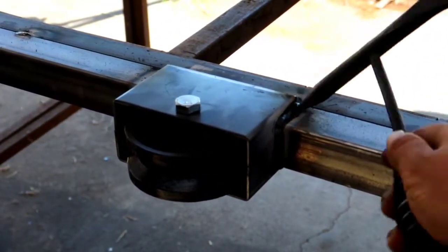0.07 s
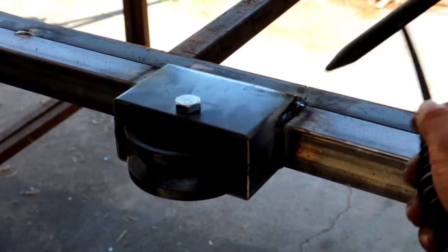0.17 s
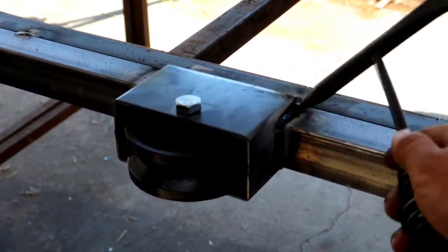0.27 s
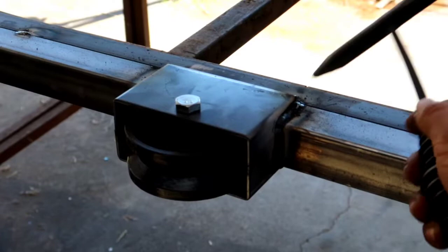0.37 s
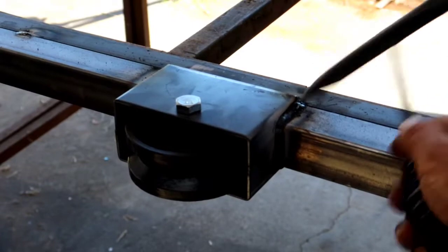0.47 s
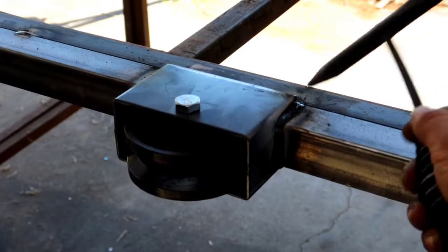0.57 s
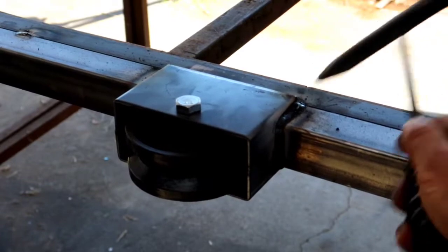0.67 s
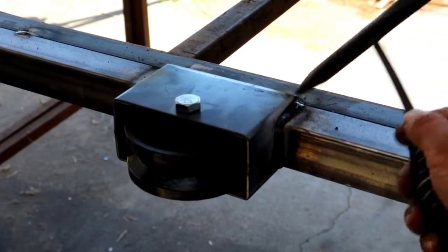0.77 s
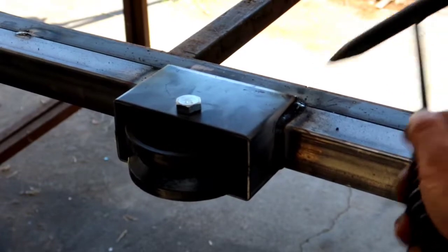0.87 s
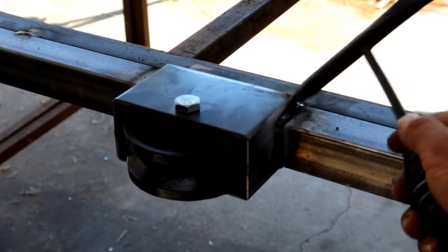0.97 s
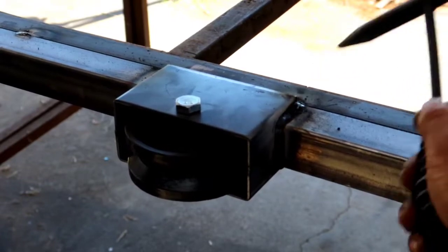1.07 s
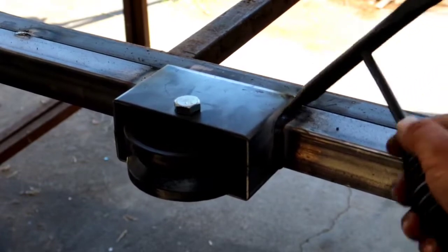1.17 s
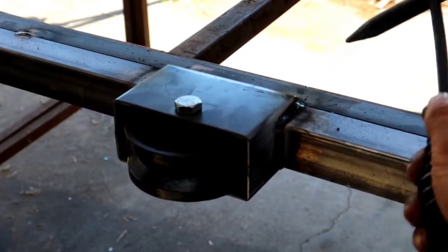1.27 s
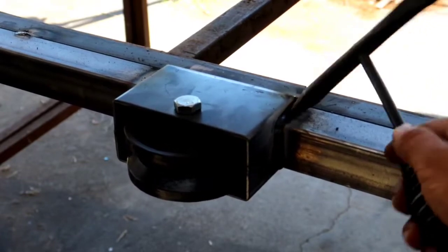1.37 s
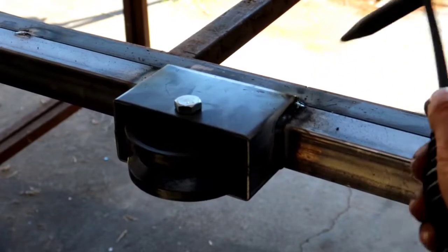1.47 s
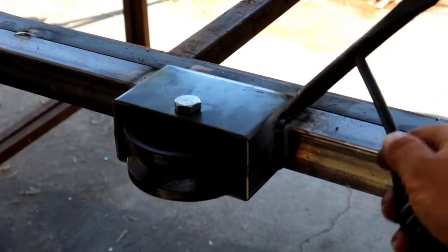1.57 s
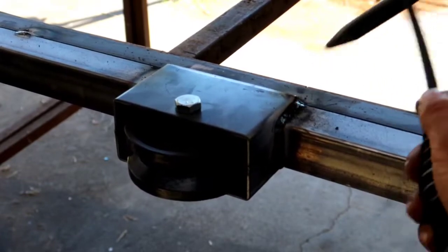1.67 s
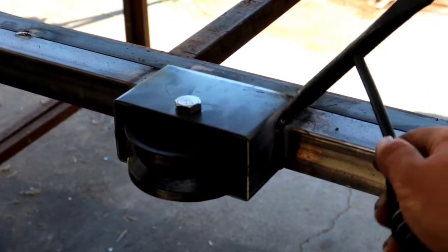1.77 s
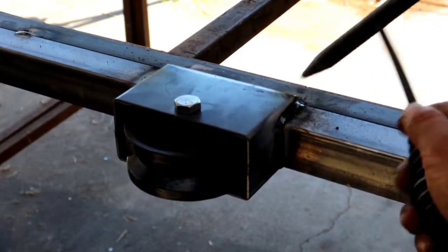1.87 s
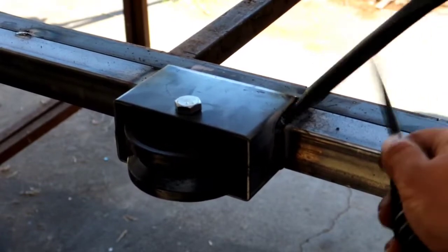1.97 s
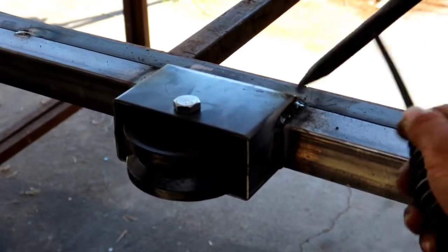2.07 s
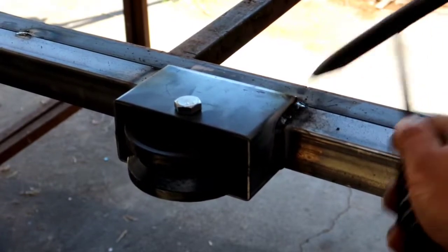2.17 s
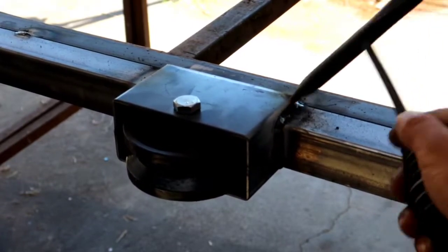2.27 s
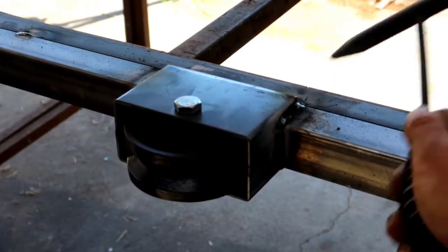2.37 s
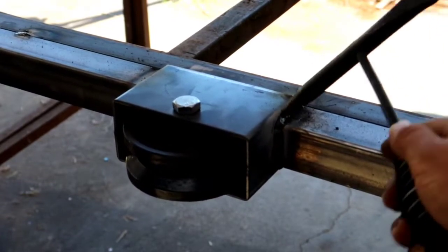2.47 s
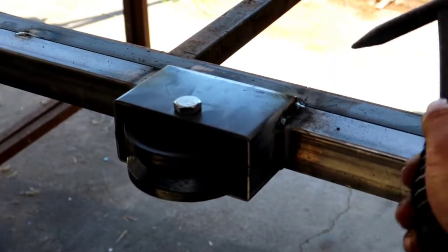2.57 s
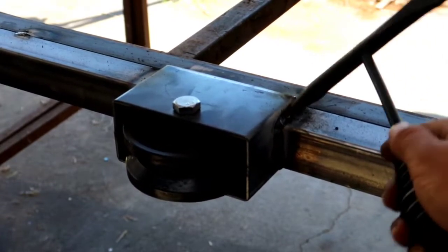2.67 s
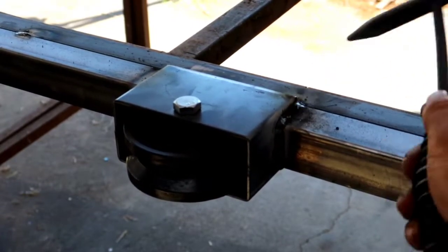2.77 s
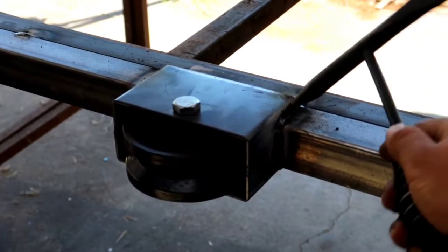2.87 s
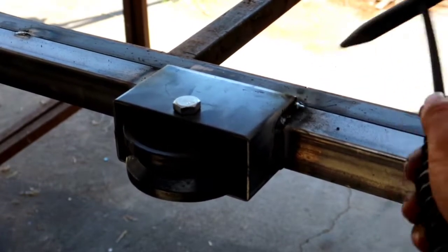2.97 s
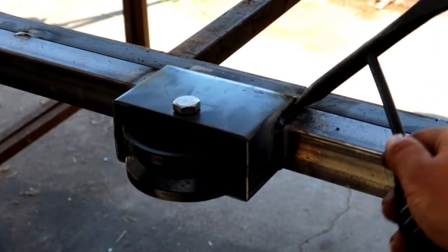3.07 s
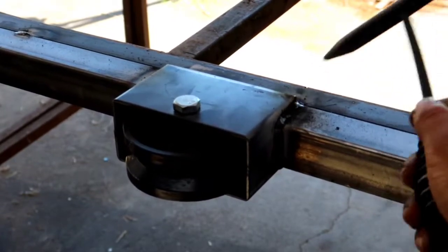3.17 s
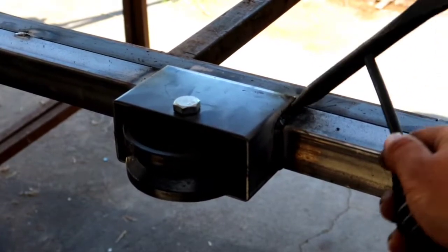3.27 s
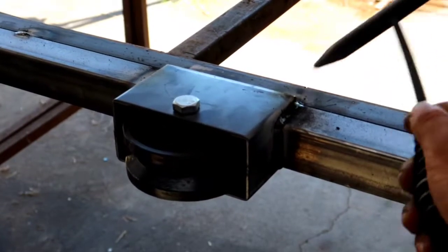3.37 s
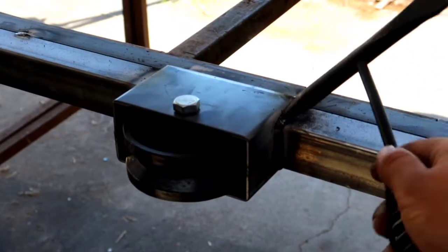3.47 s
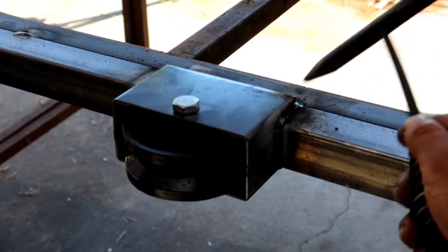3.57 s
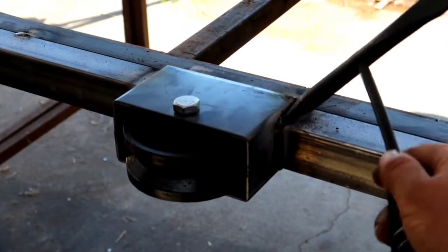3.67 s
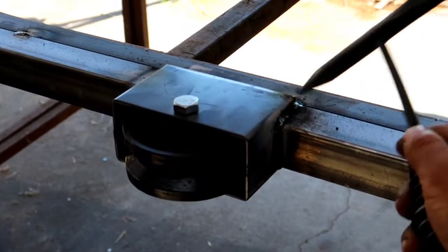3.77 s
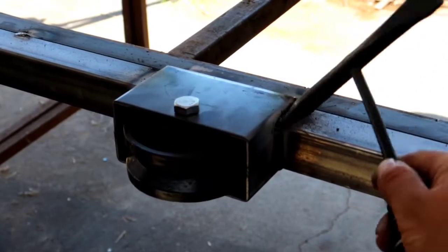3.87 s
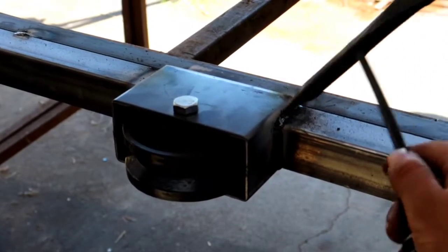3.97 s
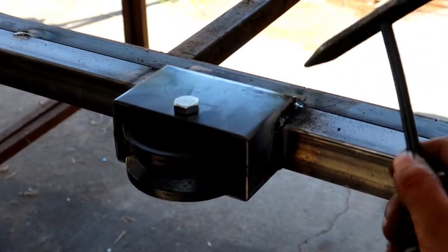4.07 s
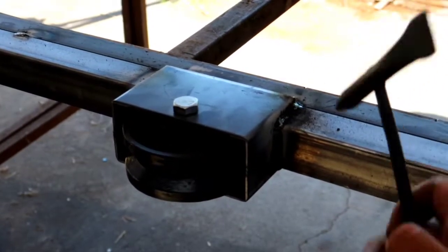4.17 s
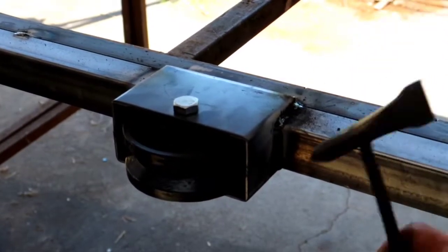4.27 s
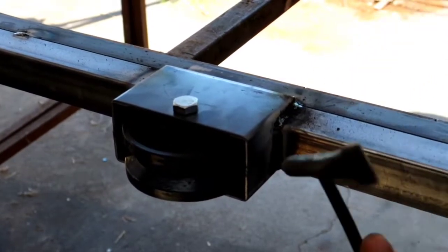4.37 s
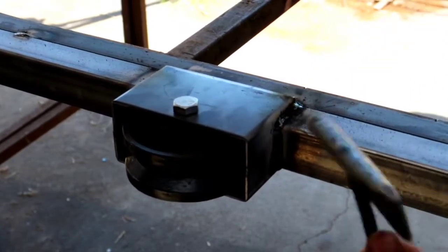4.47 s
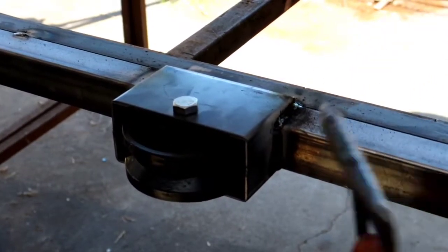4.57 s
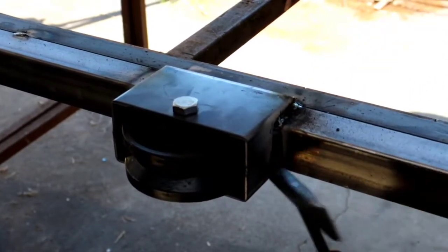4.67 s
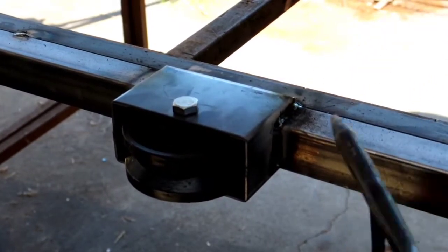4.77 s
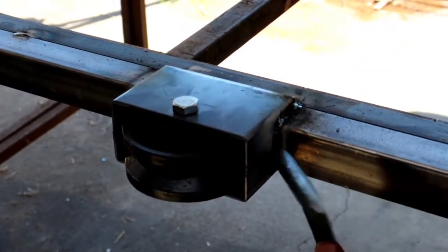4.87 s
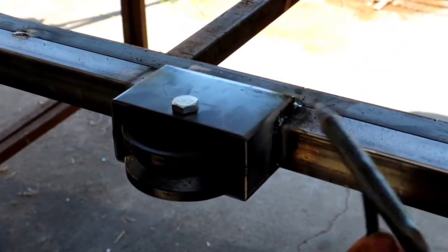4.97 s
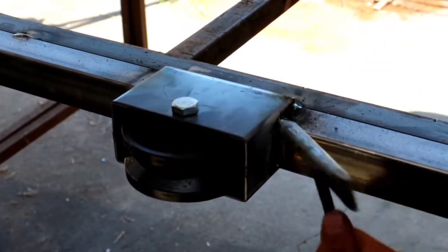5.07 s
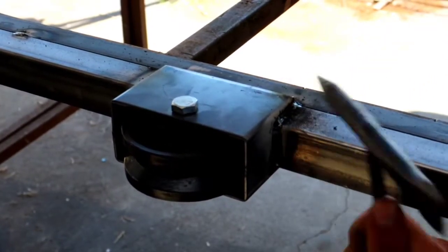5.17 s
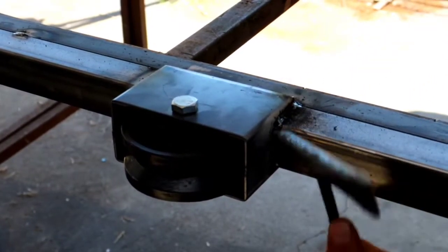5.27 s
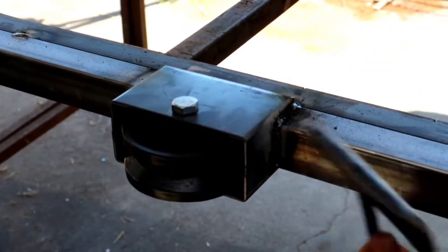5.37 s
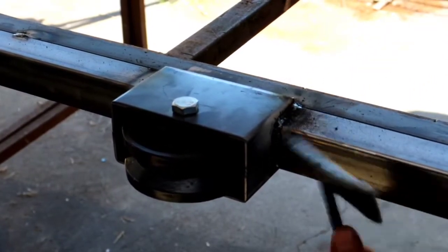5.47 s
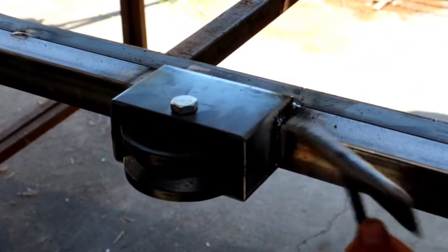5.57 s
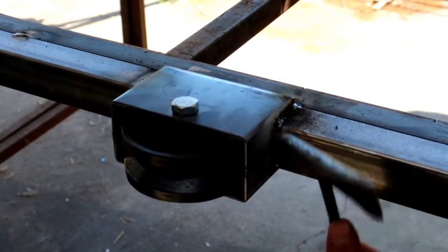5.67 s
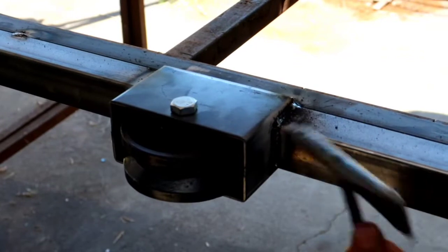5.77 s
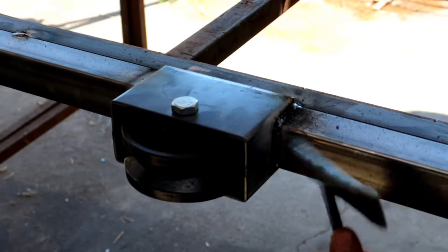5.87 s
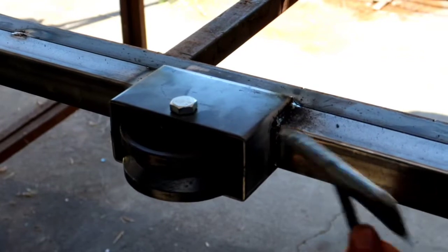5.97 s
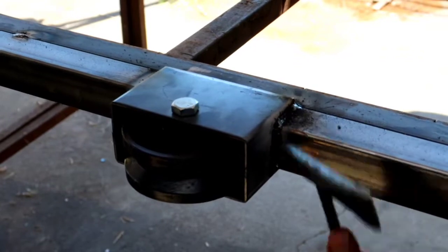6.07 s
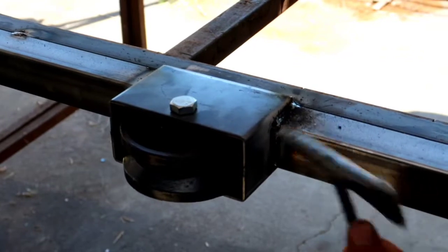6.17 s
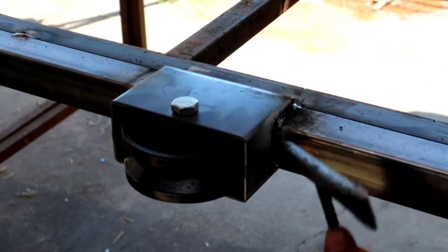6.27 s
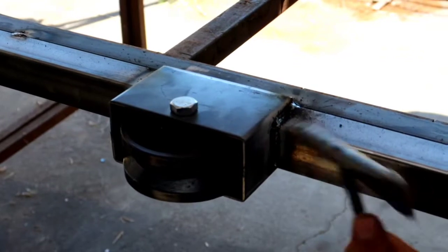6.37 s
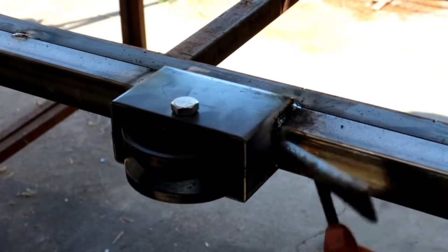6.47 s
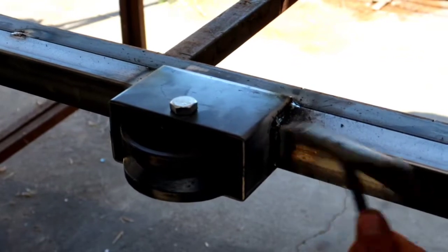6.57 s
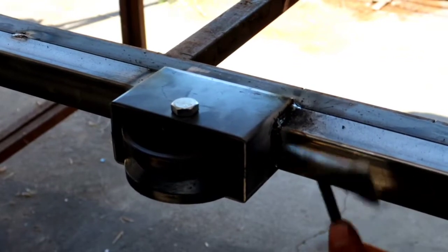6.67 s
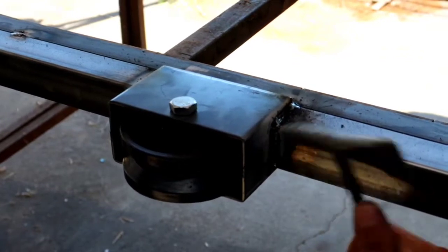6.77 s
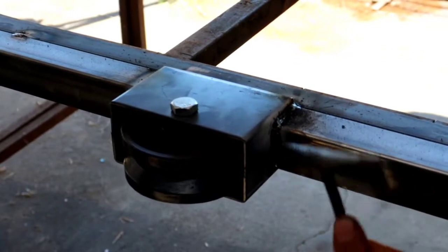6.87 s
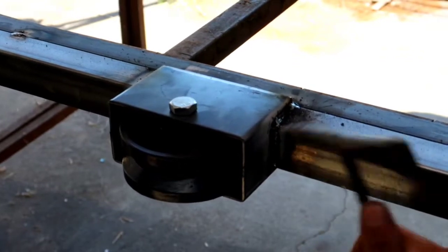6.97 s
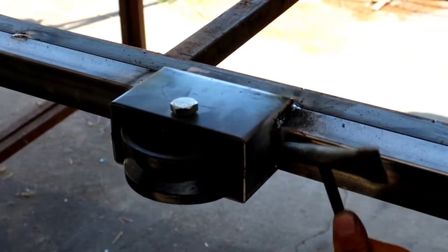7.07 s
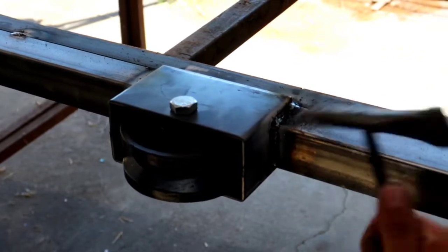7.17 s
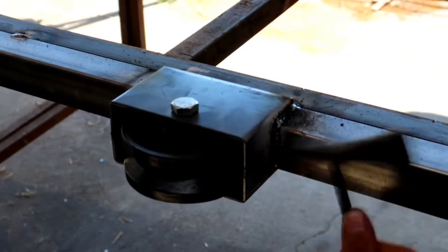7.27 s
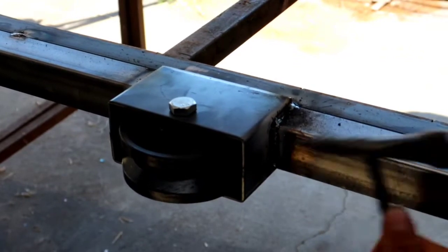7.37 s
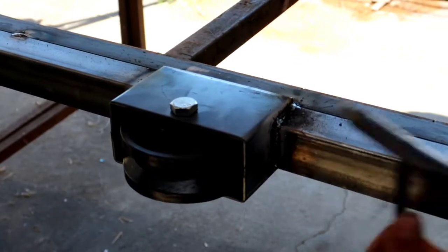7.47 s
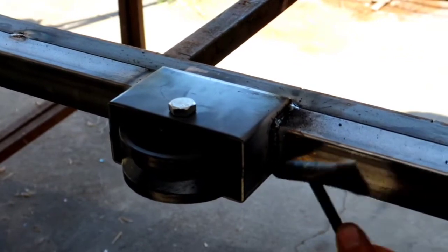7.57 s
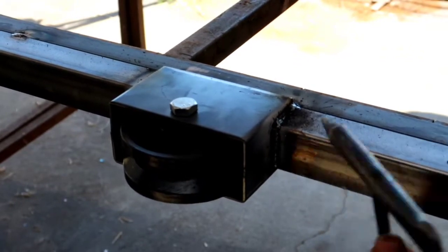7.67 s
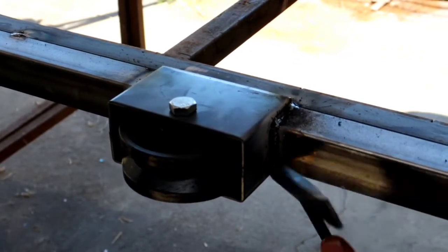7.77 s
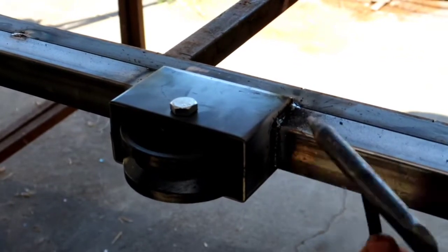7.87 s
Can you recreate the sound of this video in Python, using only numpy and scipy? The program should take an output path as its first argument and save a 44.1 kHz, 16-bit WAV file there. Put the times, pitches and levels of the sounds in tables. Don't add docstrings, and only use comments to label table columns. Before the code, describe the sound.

A pointed steel hammer taps a weld on a hollow steel frame about five times a second, pauses briefly, then taps from another side.

```python
import sys
import numpy as np
from scipy import signal
from scipy.fft import rfft, irfft, next_fast_len
from scipy.io import wavfile
from scipy.ndimage import uniform_filter1d, minimum_filter1d, map_coordinates

SR = 44100
rng = np.random.default_rng(int(sys.argv[2]) if len(sys.argv) > 2 else 0)


def wav_out(sig):
    wavfile.write(sys.argv[1], SR, np.round(np.clip(np.atleast_2d(sig).T, -1, 1) * 32767).astype(np.int16))


def amplitude_ratio(level_db):
    exponent = np.asarray(level_db, float) / 20
    return 10 ** exponent


N = 349713
LIFE = SR // 2
TURN_S = 4.4

# (time [s], force [dB], squareness of the hit [dB], share on the tube wall [dB],
# bare steel against slag [dB])
FIRST_TAPS = [(-0.043, -22, -10.5, -14, 5), (0.1688, -19, 2.5, -0.5, 0), (0.3797, -20.5, 2.5, 0, 0.5),
              (0.5895, -21.5, -2.5, -9, 1.5), (0.7958, -18.5, -18, -10, 0.9), (1.0066, -20, 5.5, -0.5, 0.5),
              (1.2229, -21.5, 4.5, -8.5, 2.5), (1.4345, -20.5, -4, -6.5, -2.5),
              (1.653, -21.5, 4.5, -15, 0.5), (1.8676, -22.5, -11, -9, 2), (2.0875, -22.5, -0.5, -3, 1),
              (2.2981, -21.5, -3.5, 1, 0.5), (2.5129, -20, -9, 0, 2.5), (2.7354, -20.5, 1, -4, 2),
              (2.9445, -18.5, -2, -3, 0.5), (3.1555, -21.5, 4.5, 0.5, 0.5), (3.3605, -25, -15, -0.5, 4.5),
              (3.575, -24, 9, -15.5, 6.5), (3.7831, -24.5, 3.2, -15, 6), (3.9811, -29, 1.5, 1.5, 4)]
# (time [s], force [dB], squareness of the hit [dB], share on the tube wall [dB],
# bare steel against slag [dB])
SECOND_TAPS = [(4.7306, -21.5, -9, -0.5, 3), (4.9536, -22.5, -3.5, 2, 5.5), (5.1625, -29.5, 7, 11, 9),
               (5.385, -24.5, 2.6, 2.5, 3.5), (5.595, -25.5, 3.5, -10, 1.5), (5.789, -24.5, 9.5, -15.5, 6),
               (5.994, -26.5, 3.2, 0.5, 6.5), (6.1911, -26.5, 8, -15, 6.5), (6.3852, -27.5, 6, -15, 5.5),
               (6.584, -27, 5, 0.5, 4.5), (6.7906, -28.5, 0.5, 5.5, 3.5), (6.989, -28, -0.5, -2.5, 0.5),
               (7.1836, -25, 2, 4.5, 5.7), (7.395, -23.5, -9.5, 0, 4.5), (7.6313, -24, 4.5, 6, 4),
               (7.844, -22.5, 2, -3.5, 2.5)]
TAPS = FIRST_TAPS + SECOND_TAPS
TAP_S, FORCE_DB, SQUARE_DB, WALL_DB, BARE_DB = np.transpose(TAPS)[..., None]
FROM_FIRST = TAP_S < TURN_S


def unit(x):
    return x / np.sqrt(np.mean(x ** 2) + 1e-20)


def along(points, hz):
    f, v = np.transpose(points)
    return np.interp(np.log(hz + 1), np.log(f + 1), v)


def shaped(x, gain):
    m = next_fast_len(x.shape[-1] + 4096)
    spectrum = rfft(x, m) * gain(np.fft.rfftfreq(m, 1 / SR))
    return irfft(spectrum, m)[..., :x.shape[-1]]


def stereo_spread(hz, wider_db=0):
    # (frequency [Hz], side minus mid [dB])
    side_over_mid = [(60, -28), (110, -32.5), (200, -31), (380, -26), (700, -24.5), (1290, -15.5),
                     (2380, -13), (4400, -5.5), (8120, 0), (15000, -4)]
    return np.array([np.ones_like(hz), np.minimum(amplitude_ratio(along(side_over_mid, hz) + wider_db), 1)])


def reach(base_db, per_square, per_wall, per_bare):
    return base_db + per_square * SQUARE_DB + per_wall * WALL_DB + per_bare * BARE_DB


def snap_lift():
    lift_s, lift_db = [2.2981, 2.5129, 5.1626], [1.5, 1, 7.5]
    return np.dot(np.abs(TAP_S - lift_s) < .05, lift_db)[:, None]


def ring(modes, scatter_db, detune, swell, rough, size=16000):
    hz, db, t60 = np.transpose(modes)
    t60 = np.minimum(t60, .5)
    t = np.arange(size, dtype=np.float32) / SR
    knots = np.clip(1 - np.abs(t * 80 - np.arange(31, dtype=np.float32)[:, None]), 0, 1)
    luck = rng.standard_normal((len(TAPS), len(modes), 2 + 2 * len(knots)), dtype=np.float32)
    decay = amplitude_ratio(db[:, None] - 60 * t / t60[:, None]) * (1 - np.exp(-t / swell))
    rows = []
    for row in luck:
        strength, bend = row[:, 0], row[:, 1]
        waver, drift = row[:, 2:].reshape(len(modes), 2, -1).transpose(1, 0, 2) @ knots
        phase = 2 * np.pi * np.outer(hz * (1 + detune * bend), t) + rough * (drift - drift[:, :1])
        partials = decay * (1 + .5 * rough * waver) * np.sin(phase, dtype=np.float32)
        rows.append(amplitude_ratio(scatter_db * strength) @ partials)
    return np.pad(rows, ((0, 0), (0, LIFE - size)))


def hammer_tip():
    # (frequency [Hz], level [dB], t60 [s])
    tip_before = [(1010, -17.5, 0.022), (1538, -4, 0.024), (3730, -6, 0.018), (4460, -7, 0.0056),
                  (7160, -15, 0.013), (8830, -20.5, 0.014), (13660, -26, .004)]
    # (frequency [Hz], level [dB], t60 [s])
    tip_after = [(847, -14, 0.12), (1376, -9, 0.075), (1710, -2, 0.02), (2460, -9.5, 0.042),
                 (4630, -12, 0.018), (7220, -12, 0.0089), (13700, -25, .004)]
    t = np.arange(LIFE) / SR
    crack_hz = np.where(FROM_FIRST, 2535, 3004)
    ping_hz, ping_t60_s = 4820, 0.012
    ping_db = reach(1.7, -0.27, 0.93, 0.25) + snap_lift()
    tip = np.where(FROM_FIRST, ring(tip_before, 2, .03, 1e-4, 0, size=2000),
                   ring(tip_after, 2, .03, 1e-4, 0, size=2000))
    tip = tip + amplitude_ratio(3.4 - 60 * t / 0.012) * np.sin(2 * np.pi * np.outer(crack_hz, t))
    tip *= amplitude_ratio(9.5 + 1.3 * SQUARE_DB)
    return tip + amplitude_ratio(ping_db - 60 * t / ping_t60_s) * np.sin(2 * np.pi * ping_hz * t)


def tube_wall():
    # (frequency [Hz], level [dB], t60 [s])
    wall_boom = [(853, 5.5, .1)]
    return ring(wall_boom, 0, .005, 0.005, 0.7) * amplitude_ratio(3 + 1.26 * WALL_DB)


def steel_modes():
    # (frequency [Hz], level [dB], t60 [s])
    bar_modes = [(2575, -4, .1), (2612, -9, .25), (2640, -9, .33), (2668, -11, .3), (2695, -10, .33),
                 (2745, -6, .14)]
    # (frequency [Hz], level [dB], t60 [s])
    frame_modes = [(555, -18.5, 0.53), (618, -23, 0.78), (695, -34, 0.19), (1286, -9, 0.11),
                   (1308, -9, 0.21), (1610, -16.5, 0.22), (1970, -25.5, 0.11), (1962, -5.5, 0.25),
                   (2194, -8.5, 0.2), (3090, -22.5, 0.3), (3250, -7, 0.26), (4160, -25, 0.12),
                   (4063, -11, 0.24), (4325, -12, .2), (4710, -14.5, 0.27), (5260, -16.5, 0.19),
                   (6400, -13.5, 0.16)]
    # (frequency [Hz], level [dB], t60 [s])
    first_side_modes = [(969, -1.5, 0.13), (1244, -10, 0.41), (1518, -14, 1), (2320, -5, 0.13)]
    # (frequency [Hz], level [dB], t60 [s])
    second_side_modes = [(1185, -9, 0.5), (1660, -8, 0.1)]
    bar = ring(bar_modes, 2, .003, .003, 1.3) * amplitude_ratio(reach(1.5, 0.12, -.3, -0.32))
    frame = ring(frame_modes, 1.5, .004, .003, 1.9)
    one_side = np.where(FROM_FIRST, ring(first_side_modes, 2, .003, .003, .7),
                        ring(second_side_modes, 2, .003, .003, 1.8))
    return bar + frame + one_side


def dying_noise(repeat):
    # (frequency [Hz], t60 [s])
    dying = [(200, 0.61), (700, 0.37), (1800, 0.44), (4800, 0.32), (12000, 0.26)]
    noise = rng.standard_normal((len(TAPS), 2, LIFE))
    noise = np.sqrt(1 - repeat) * noise + np.sqrt(repeat) * rng.standard_normal((2, LIFE))
    hz, t, z = signal.stft(noise, SR, nperseg=128)
    patches = uniform_filter1d(rng.standard_normal(z[:, :1].shape), size=2, axis=2)
    patches = unit(uniform_filter1d(patches, size=10, axis=3))
    z = z * amplitude_ratio(2.5 * patches - 60 * t / along(dying, hz)[:, None])
    tail = signal.istft(z, SR, nperseg=128)[1][..., :LIFE]
    return tail * (1 - np.exp(-np.arange(LIFE) / (SR * 0.0013)))


def frame_clang(shed):
    # (frequency [Hz], level [dB per Hz])
    clang_colour = [(60, -15.5), (200, -14), (450, -16), (800, 1), (1400, 1), (2200, -0.5), (3000, 0),
                    (5000, -5.5), (5900, -11.5), (6400, -12), (8000, -17), (12000, -21.5), (15000, -23)]
    clang = shaped(shed, lambda hz: amplitude_ratio(along(clang_colour, hz)) * stereo_spread(hz))
    return clang * amplitude_ratio(3) / np.sqrt(np.mean(clang[:, 0, :400] ** 2))


def shed_echo(tip, wall, steel, shed):
    # (delay [s], level [dB])
    walls = [
        (.0045, -12),
        (.0085, -2.5),
        (.013, -14.5),
        (.02, -28),
        (.031, -21),
    ]
    t = np.arange(LIFE // 2) / SR
    feed = shed[..., :LIFE // 2] * amplitude_ratio(-t * 260)
    echo = amplitude_ratio(-26.0) * signal.fftconvolve((steel + .5 * wall)[:, None], feed, axes=2)[..., :LIFE]
    turns = rng.uniform(-2.04, 1, (len(TAPS), 2, len(walls)))
    dull = uniform_filter1d(tip, size=5, axis=1) * amplitude_ratio(-.5 * SQUARE_DB)
    for k, (delay_s, db) in enumerate(walls):
        echo += amplitude_ratio(db) * turns[..., k, None] * np.roll(dull, round(delay_s * SR), 1)[:, None]
    return shaped(echo, stereo_spread)


def contact(hz):
    # (frequency [Hz], width [octaves])
    spots = [(4530, 1), (317, 0.79), (1440, 0.22)]
    snap_db = reach(-1.68, 0.056, -0.077, 0.46) + snap_lift()
    thud_db = reach(4.5, -0.54, 0.11, 0.33)
    clank_db = reach(2.33, -0.0071, 0.23, 0.11)
    db = BARE_DB * np.clip(np.log2((hz + 1) / 5000), 0, 1)
    for spot_db, (centre_hz, octaves) in zip((snap_db, thud_db, clank_db), spots):
        db = db + 1.02 * spot_db * np.exp(-(np.log2((hz + 1) / centre_hz) / octaves) ** 2)
    radiation = 1j * hz / (140 + 1j * hz)
    return (amplitude_ratio(db) * radiation)[:, None]


def hammer():
    tip, wall, steel = hammer_tip(), tube_wall(), steel_modes()
    shed = dying_noise(repeat=0.26)
    near = tip + wall + steel * amplitude_ratio(-3.0)
    side = np.where(FROM_FIRST, -.02, -.1) * near + 0.94 * np.gradient(tip, axis=1)
    blows = frame_clang(shed) + shed_echo(tip, wall, steel, shed) + np.stack([near, side], 1)
    out = np.zeros((2, N + SR + LIFE))
    for start_s, db, blow in zip(TAP_S[:, 0], FORCE_DB[:, 0], shaped(blows, contact)):
        out[:, SR + round(start_s * SR):][:, :LIFE] += amplitude_ratio(db) * blow
    return out[:, SR:SR + N]


def stand_scuff():
    time_s, span_s, level_db = 7.555, .022, -37
    start_hz, sag_hz_per_s = 170, 1500
    u = np.arange(N) / SR - time_s
    groan = np.sin(2 * np.pi * (start_hz - .5 * sag_hz_per_s * u) * u)
    return amplitude_ratio(level_db) * np.exp(-(u / span_s) ** 2) * groan


def yard():
    # (time [s], level [dB])
    yard_loudness = [(0.0, -42.5), (1.83, -49.5), (3.07, -45), (3.4, -44), (3.6, -49.5), (4.24, -57),
                     (4.6, -57), (4.9, -46.5), (6.56, -59), (7.51, -50.5), (7.93, -51.5)]
    # (frequency [Hz], level [dB per Hz])
    rumble_colour = [(12, -33.5), (25, -7.5), (43, -5.5), (100, 0), (150, -5), (220, -5.5), (350, -50.5),
                     (700, -100)]
    # (frequency [Hz], level [dB per Hz])
    traffic_colour = [(120, -14), (220, -2), (420, -1.5), (900, -5.5), (2400, -16.5), (4600, -33),
                      (8000, -43), (16000, -43)]
    lorry_s, lorry_span_s, lorry_db = 4.55, .35, 9.5
    rumble_db, rush_db, rumble_swing = -5.5, 2.5, 1.15
    wider_db = 7
    t = np.arange(N) / SR
    loud_db = np.interp(t, *np.transpose(yard_loudness))
    swell_db = loud_db.mean() + rumble_swing * (loud_db - loud_db.mean())
    swell_db += lorry_db * np.exp(-((t - lorry_s) / lorry_span_s) ** 2)
    lumps = amplitude_ratio(1.3 * map_coordinates(rng.standard_normal(80), [t * 5]))

    def coloured_noise(colour):
        noise = rng.standard_normal((2, N))
        return unit(shaped(noise, lambda hz: amplitude_ratio(along(colour, hz)) * stereo_spread(hz, wider_db)))
    rumble = amplitude_ratio(swell_db + rumble_db) * lumps * coloured_noise(rumble_colour)
    rush = amplitude_ratio(loud_db + rush_db) * coloured_noise(traffic_colour)
    return rumble + rush


def scene():
    mid, side = hammer() + stand_scuff() * [[1], [0]] + yard()
    return np.array([mid + side, mid - side])


def roll_off(x):
    return signal.sosfilt(signal.butter(12, 16410, fs=SR, output="sos"), x)


def record(dry):
    # (frequency [Hz], share of the sound spread over a frame [dB])
    smear = [(300, -20), (2000, -17), (5000, -7.5), (9000, 0.5), (15000, -1.5)]
    # (frequency [Hz], share lost in mid [0-1], share lost in side [0-1])
    lost = [(5800, 0, 0), (6600, .07, 1), (10000, .35, 1), (13000, .5, 1), (15000, .65, 1)]
    sharp_peak, top_hz = 0.72, 15300
    lead = 293
    rounded = dry / (1 + np.abs(dry / .93) ** 6) ** (1 / 6)
    left, right = np.pad(rounded, ((0, 0), (lead, 0)))

    hz, _, z = signal.stft(np.array([left + right, left - right]) / 2, SR, nperseg=2048)
    peak = -minimum_filter1d(-np.abs(np.pad(left + right, (0, 2048))) / 2, size=2048)
    peak = peak[::1024][:z.shape[2]]
    share = np.minimum(amplitude_ratio(along(smear, hz)), .95)[:, None] * np.clip((sharp_peak - peak) / 0.37, .35, .75)
    spread = np.abs(z) * np.exp(2j * np.pi * rng.random(z.shape))
    z = np.sqrt(1 - share ** 2) * z + 1.39 * share * spread
    smeared = signal.istft(z, SR, nperseg=2048)[1]

    hz, _, z = signal.stft(smeared, SR, "cosine", nperseg=2048)
    z *= amplitude_ratio(-np.clip(hz - top_hz, 0, 3000) * 0.035)[:, None]
    dice = rng.random((2, 65, z.shape[2]))
    dice = np.repeat(np.repeat(dice, 16, 1), 2, 2)[:, :len(hz), :z.shape[2]]
    lost_hz, lost_mid, lost_side = np.transpose(lost)
    odds = np.array([np.interp(hz, lost_hz, lost_share) for lost_share in (lost_mid, lost_side)])[..., None]
    frame_db = 10 * np.log10(np.sum(np.abs(z[0]) ** 2, 0) + 1e-20)
    quiet = np.clip((frame_db.max() - 7 - frame_db) / 14, 0, 1)
    kept = z * (dice >= odds * quiet)
    mid, side = signal.istft(kept, SR, "cosine", nperseg=2048)[1][:, lead:lead + N]
    return roll_off(np.array([mid + side, mid - side]))


dry = scene()
out = record(dry)
wav_out(out)
```